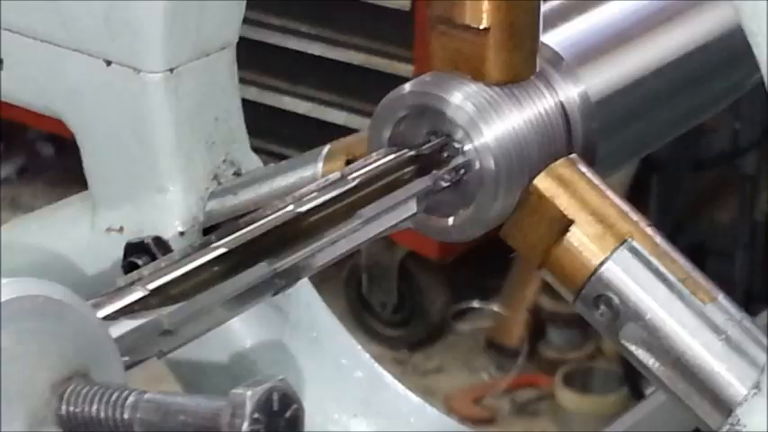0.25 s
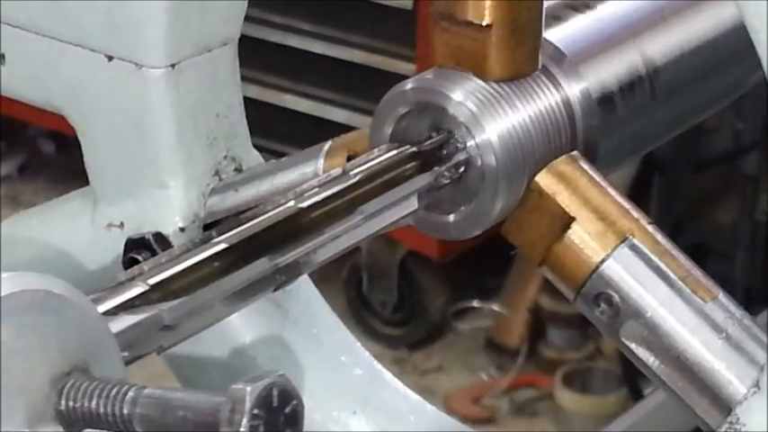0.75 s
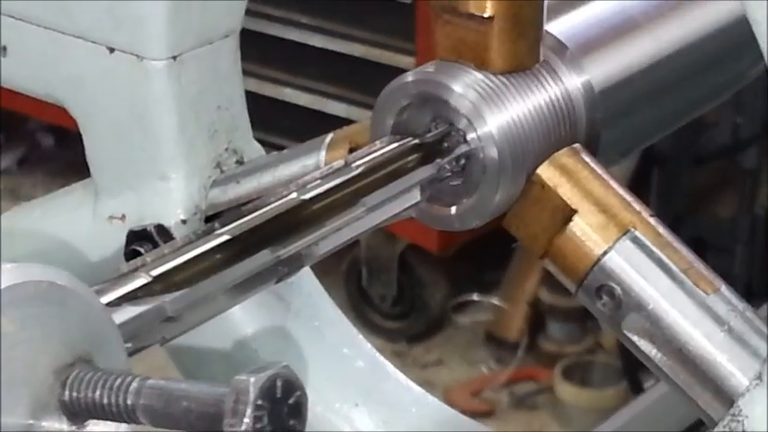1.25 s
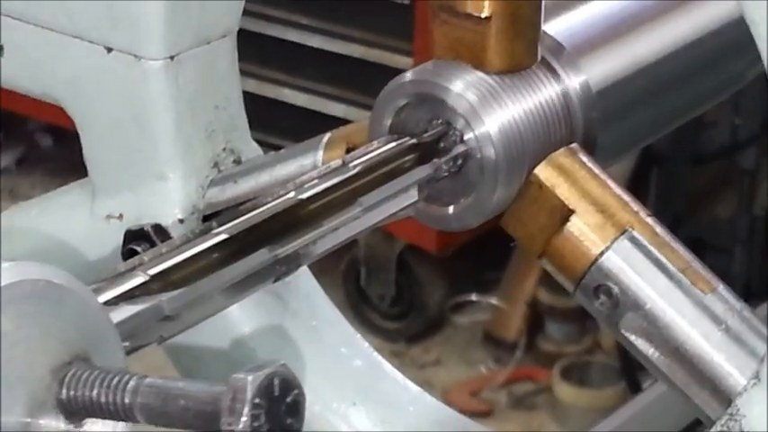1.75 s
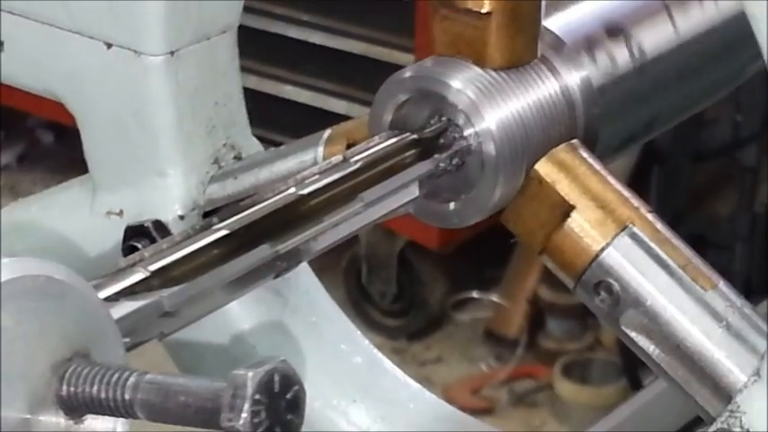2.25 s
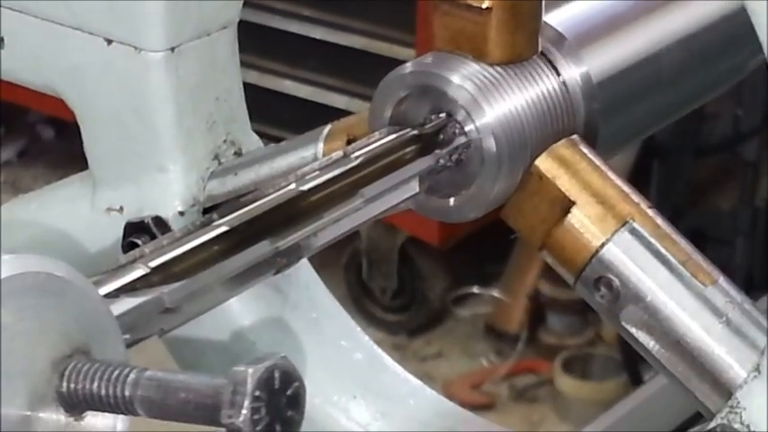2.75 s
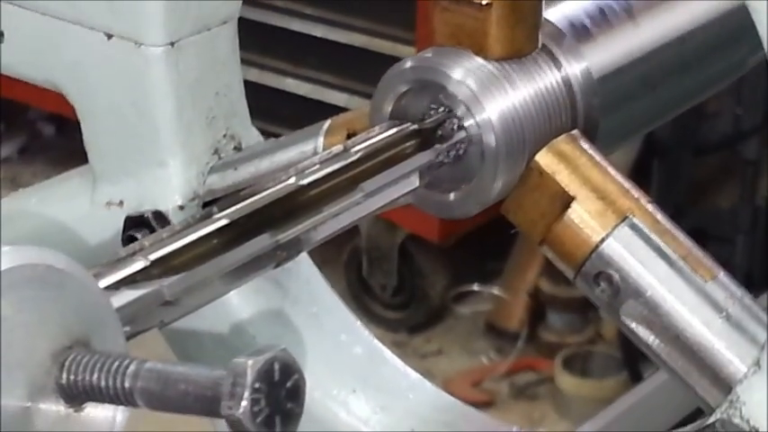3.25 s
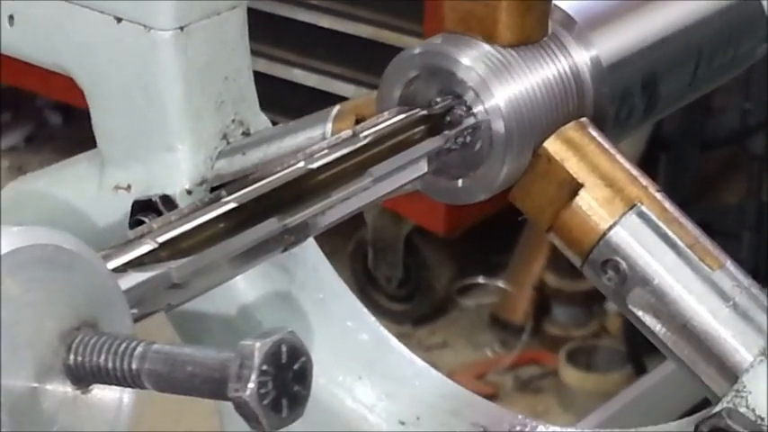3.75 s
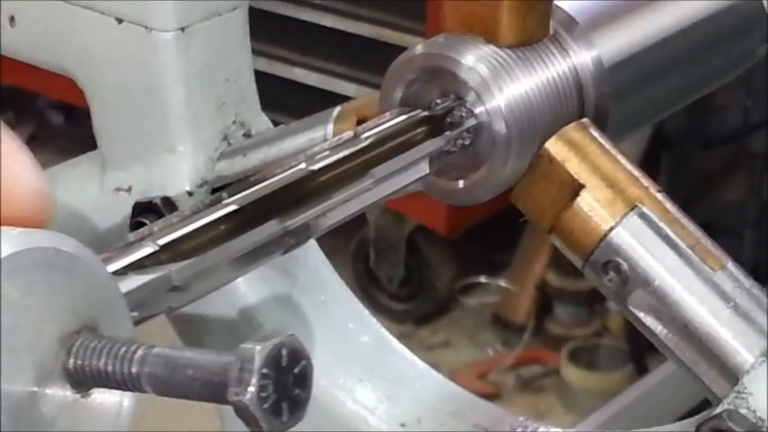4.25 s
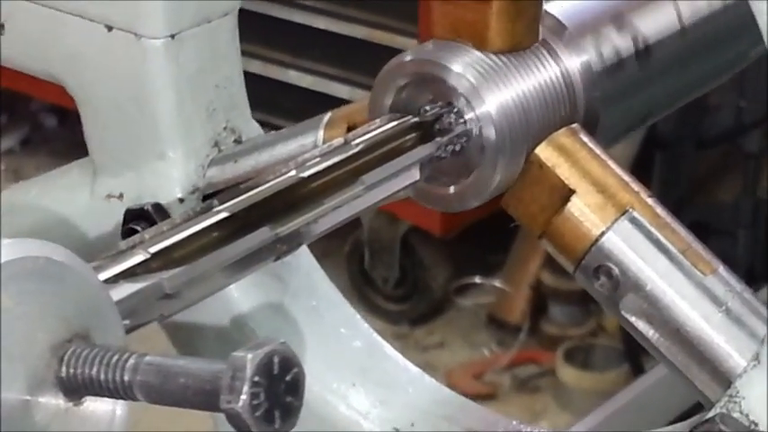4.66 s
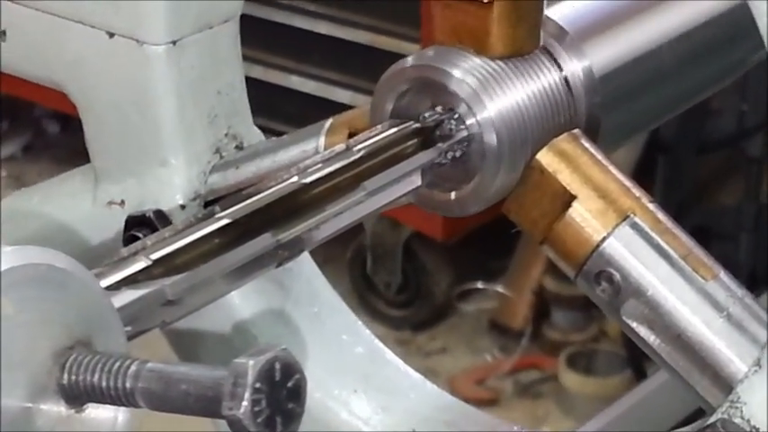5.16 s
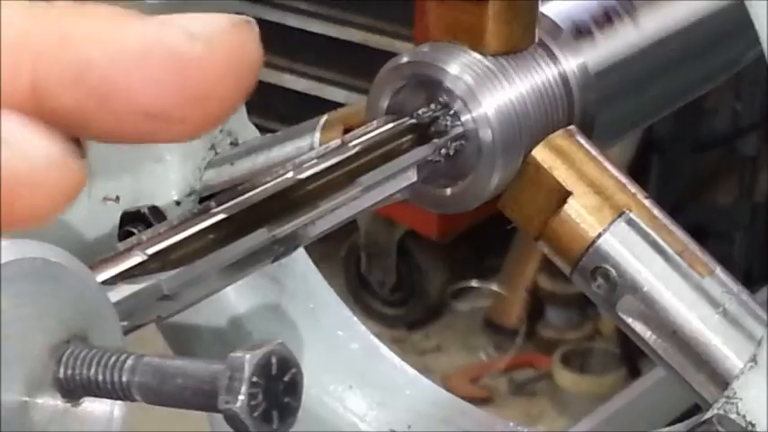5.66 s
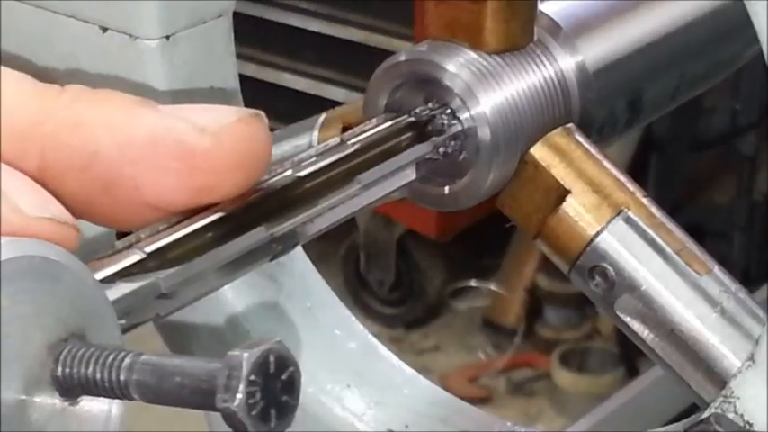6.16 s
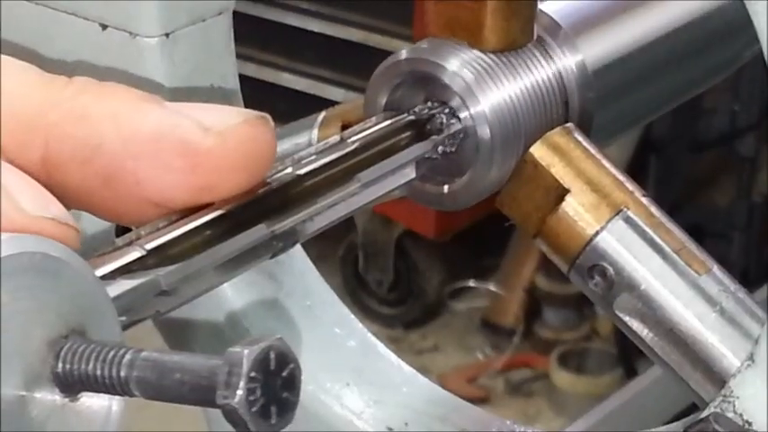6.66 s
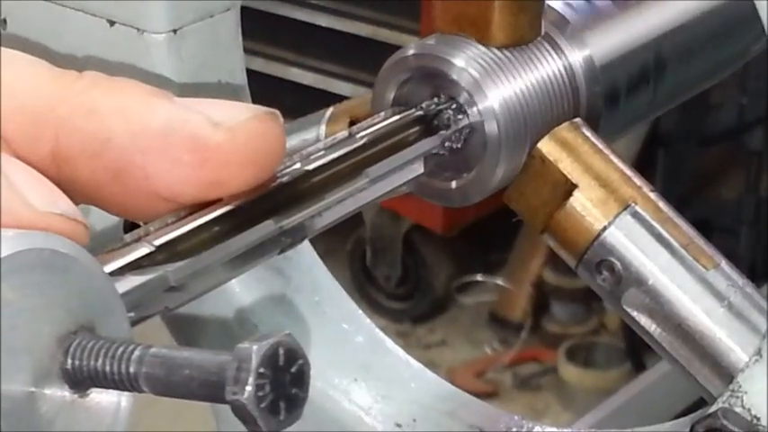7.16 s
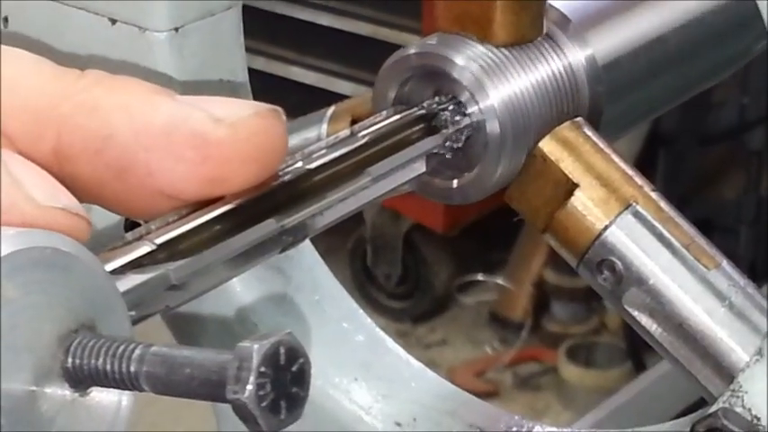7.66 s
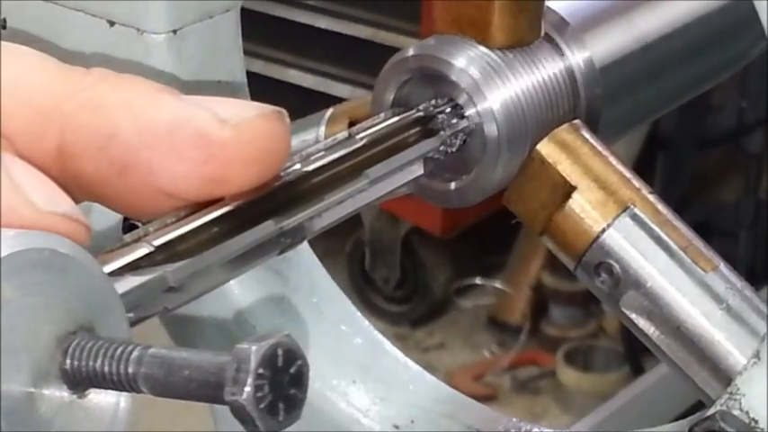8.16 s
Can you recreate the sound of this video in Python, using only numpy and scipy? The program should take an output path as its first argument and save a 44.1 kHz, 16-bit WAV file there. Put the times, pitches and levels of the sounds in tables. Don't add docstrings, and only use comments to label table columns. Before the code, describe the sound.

Close, steady motor hum and soft machine rush, with very high metallic chirps pulsing from the cutting tool, pausing, then shrieking at the end.

```python
import sys
import numpy as np
from scipy import signal
from scipy.fft import rfft, irfft
from scipy.io import wavfile
from scipy.ndimage import uniform_filter1d

SR = 44100
rng = np.random.default_rng(int(sys.argv[2]) if len(sys.argv) > 2 else 0)


def materialize(psi):
    bounded = np.clip(np.atleast_2d(psi).T, -1, 1)
    quanta = np.round(bounded * 32767).astype(np.int16)
    wavfile.write(sys.argv[1], SR, quanta)


def ratio_of_db(decibels):
    return 10 ** (np.asarray(decibels, float) / 20)


N = 370881
TIME = np.arange(N) / SR
BOTH_SIDES = np.array([[.5], [-.5]])


def walk(rate):
    hold = int(SR / rate)
    steps = np.repeat(rng.standard_normal(N // hold + 1), hold)
    return 1.6 * uniform_filter1d(uniform_filter1d(steps, hold), hold)[:N]


def ports(phase, db, pan_db, lead):
    share = ratio_of_db(BOTH_SIDES * pan_db) / np.sqrt(np.cosh(pan_db * np.log(10) / 20))
    return np.sqrt(2) * ratio_of_db(db) * share * np.sin(phase + BOTH_SIDES * lead)


def on_log_axis(hz, table):
    table = np.array(table)
    return np.interp(np.log(hz), np.log(table[:, 0]), table[:, 1])


# (f/Hz, level/dB per Hz)
RUSH_LEFT = [(30, -80), (90, -80), (125, -62), (165, -70.5), (260, -65), (520, -70), (900, -71.5),
             (2000, -73), (3350, -81), (4000, -77), (6000, -83.5), (8500, -87.5), (11000, -96.5),
             (14500, -100)]
RUSH_RIGHT = [(30, -88), (90, -82), (125, -66.5), (165, -68), (260, -65), (520, -70), (900, -73.5),
              (1800, -75), (2300, -80), (3400, -85.5), (4200, -83), (5800, -86), (8800, -88.5),
              (14500, -102)]
# (f/Hz, width/Hz, left level/dB, right level/dB)
CASING = [(368.5, 13, 12, 8.5), (433, 18, 8, 11.5), (450, 23, 4, 4), (630, 71, 3.5, 3.5), (812, 67, 6, 3.5),
          (1304, 56, -1, 2.5), (1570, 130, 1.5, -2.5), (2040, 65, 1.5, -0.5), (2910, 190, 4, -1),
          (3960, 270, 3, 6), (4950, 130, 8, 8.5), (7190, 1840, 0.5, 10.5), (8900, 320, 5.5, -1.5),
          (10240, 560, 4, 2.5), (11550, 670, -3.5, -7), (12000, 380, 9.5, -6), (13400, 340, 4.5, -2),
          (14170, 250, 6, 4)]
# (f/Hz, correlation)
ALIKE = [(60, 0.64), (130, 0.81), (290, 0.79), (630, 0.58), (1390, -0.2), (3040, -0.024), (6660, -0.036),
         (14600, -0.0017)]


def rush():
    hz = np.maximum(np.fft.rfftfreq(N, 1 / SR), 1)
    db = np.array([on_log_axis(hz, RUSH_LEFT), on_log_axis(hz, RUSH_RIGHT)])
    for centre_hz, width_hz, left_db, right_db in CASING:
        db = db + np.array([[left_db], [right_db]]) / (1 + (2 * (hz - centre_hz) / width_hz) ** 2)
    ripple = uniform_filter1d(uniform_filter1d(rng.standard_normal(db.shape), size=90), size=90)
    db = db + 2.0 * ripple / ripple.std() * np.clip(hz / 900, 0, 1)
    db = db - 40 * np.clip((hz - 14550) / 500, 0, 1)

    alike = np.clip(on_log_axis(hz, ALIKE), -.99, .99)
    mid, side = rfft(rng.standard_normal((2, N)))
    mixed = np.sqrt(1 + alike) * mid + np.sqrt(1 - alike) * side * np.array([[1], [-1]])
    spectrum = ratio_of_db(db) * np.sqrt(SR / 4) * mixed

    out = 0
    for octave in range(5, 15):
        share = np.cos(np.pi / 2 * np.clip(np.log2(hz) - octave, -1, 1)) ** 2
        flicker_db = 0.34 * walk(5.2) + 0.56 * walk(25)
        out = out + ratio_of_db(flicker_db) * irfft(spectrum * share, N)
    return out


# (f/Hz, level/dB, left minus right/dB, left leads/rad)
GEARS = [(135, -52.4, 0, 0.2), (330, -52.9, 7, -0.1), (432, -48.5, -3, 0.6), (456, -48.1, 0, 0.0),
         (466, -51.6, -2, 0.4), (919, -60.5, 0, 0.5), (1223, -54.5, 1, 1.7), (1312, -58.6, 17, 3.0),
         (1378, -57.7, -2, -2.5), (1432, -50.0, 5, -2.3), (1472, -53.9, 9, -2.2), (1551, -56.0, 5, -2.6),
         (1563, -51.7, 13, -2.2), (1581, -60.8, 7, -3.1), (1758, -59.8, 7, 1.3), (1879, -59.2, -6, 0.6),
         (1892, -62.1, 6, -1.0), (1908, -62.6, 6, 0.1), (2053, -63.3, 22, -0.6), (2083, -64.6, 13, 0.9),
         (2162, -63.8, 4, -0.3), (2185, -61.6, 10, -0.7), (2212, -61.3, 14, -0.8), (2269, -64.4, 7, 0.3),
         (2623, -62.3, 4, 1.9), (2743, -54.6, 22, -2.6), (2863, -63.4, 6, 2.6), (2913, -58.3, 13, 1.2),
         (2983, -56.3, 13, -2.9), (4037, -67.3, 5, -1.4)]
BEATING = [
    (479.3, -49.5, -1, .4),
]


def gear_tone(row, wear, s):
    hz, db, pan_db, lead = row
    phase = 2 * np.pi * hz * s + .6 * wear * walk(3)
    return ports(phase, db + 1.4 * wear * walk(4), pan_db, lead)


def gears():
    worn = sum(gear_tone(row, 1, TIME) for row in GEARS)
    return worn + gear_tone(BEATING[0], .1, TIME + .0006)


# (t/s, gain/dB, length/s)
BITES = [
    (.55, -3, 0.084),
    (1.1, 3, 0.3),
    (1.767, 6, .1),
    (3.19, -8, 0.091),
    (3.7, 7, .2),
    (4.95, 6, .08),
    (5.45, -1, 0.18),
    (8.05, 3, 0.1),
    (8.41, -13, 0.14),
]


def groan(x):
    bite_db = -0.6 + sum(db * np.exp(-((TIME - s) / length) ** 2) for s, db, length in BITES)
    hz = np.fft.rfftfreq(N, 1 / SR)
    bed = irfft(rfft(x) * np.clip(6 - np.abs(hz - 437) / 6, 0, 1), N)
    return x + bed * (ratio_of_db(bite_db) - 1)


HUM_HZ, ROTOR_HZ = 119.96, 58.6
DISPERSION = 1.2
# (multiple of the hum, level/dB, left minus right/dB, left leads/rad)
IRON = [(1, -22.4, 1.5, 0.3), (2, -42.6, -6, -0.8), (3, -33.4, 3, 0.1), (4, -49.5, -1, 0.4),
        (5, -40.1, 6, 0.4), (6, -50.4, -3, 1.1), (7, -52.4, -3, 0.6), (8, -59.4, -6, 2.2),
        (9, -53.0, 10, 1.8), (10, -60.2, 3, -0.2), (12, -64.2, 0, 2.6), (17, -63.9, 1, 1.1),
        (19, -60.2, 7, 0.9), (20, -68.9, 3, 1.4), (22, -66.5, 3, 2.2), (24, -69.5, 0, -0.6)]
ROTOR = [(1, -53.0, -1, 0.7), (3, -54.9, 1, 0.4), (5, -51.5, 1, 0.5), (7, -48.9, 0, -0.0),
         (15, -58.4, 11, 0.5), (45, -60.1, 18, -2.9), (65, -58.6, 11, -2.6), (70, -62.6, 15, 0.8),
         (75, -62.6, 9, 2.5), (80, -66.0, 4, -1.1), (85, -67.0, 0, 1.1)]
# (t/s, hum level/dB)
SUPPLY = [
    (0.1, -23),
    (2.95, -22.5),
    (3.11, -22.5),
    (4.53, -23),
    (8.07, -23),
    (8.3, -22.5),
]


def motor():
    s, supply_db = np.transpose(SUPPLY)
    load_db = np.interp(TIME, s, supply_db - supply_db.mean())
    turn = 2 * np.pi * TIME
    out = 0
    for k, db, pan_db, lead in IRON:
        phase = k * HUM_HZ * turn + DISPERSION * k ** 2
        waver_db = 0.085 * (k - 1) * walk(6.2)
        out = out + ports(phase, db + load_db + waver_db, pan_db, lead)
    for k, db, pan_db, lead in ROTOR:
        out = out + ports(k * ROTOR_HZ * turn, db + .5 * walk(1.7), pan_db, lead)
    return out


# (t/s, f/Hz, level/dB)
CREAK = [
    (5.41, 1450, -62),
    (5.418, 1550, -45),
    (5.426, 1800, -43),
    (5.44, 1850, -44),
    (5.452, 1850, -62),
]


def creak():
    s, hz, db = np.transpose(CREAK)
    phase = 2 * np.pi * np.cumsum(np.interp(TIME, s, hz)) / SR
    return ports(phase, np.interp(TIME, s, db, left=-120, right=-120), pan_db=-1, lead=.5)


# (t/s, peak level/dB)
TICKS = [(0.5794, -53), (0.7183, -38), (3.0394, -51), (3.3794, -55), (3.5224, -49), (4.3294, -52),
         (4.776, -36), (5.1228, -40), (5.5483, -37), (6.0327, -35), (8.0394, -56)]


def ticks():
    size = np.zeros(N)
    for at, db in TICKS:
        size += ratio_of_db(db + 8) * (TIME >= at) * np.exp(-np.abs(TIME - at) / .0007)
    bright = signal.butter(2, [11000, 16000], "band", fs=SR, output="sos")
    return signal.sosfilt(bright, size * rng.standard_normal((2, N)))


TRAIL_S, LEAD_GROW_MS, TRAIL_GROW_MS, TRAIL_FALL_MS = 0.046, 4.1, 6.5, 6.4
LEAD_PAN_DB, TRAIL_PAN_DB, PAN_DB_PER_DB = -0.5, 1, .35
# (t/s, leading level/dB, trailing level/dB, fall/ms per 5 dB)
PASSES = [(.624, -48.5, -70, 6), (.947, -39, -70, 6), (1.757, -38, -39, 14), (2.08, -42.5, -70, 10),
          (2.234, -39.5, -70, -1), (2.721, -37, -46, 11), (2.885, -40.5, -70, 12), (3.04, -35, -70, 3),
          (3.208, -50.5, -46.5, 12), (3.365, -35, -29, 18), (3.524, -34, -46, 9), (3.693, -35, -23, 19),
          (3.844, -34.5, -51, 5), (4.013, -39.5, -70, 11), (4.172, -30.5, -31.5, 12),
          (4.33, -32.5, -29.5, 10), (4.495, -32.5, -33, 7.5), (4.65, -35.5, -70, 6), (4.818, -47, -70, 5),
          (4.975, -48, -44.5, 9), (5.142, -33.5, -51, 7), (5.299, -54, -70, 5), (5.457, -48, -70, 11),
          (5.951, -37.5, -67, 8), (6.106, -49, -69.5, 9), (8.202, -36, -70, 6)]
# (t/s, peak level/dB, growth/ms per 5 dB, fall/ms
# per 5 dB)
SINGLE_GRABS = [(.157, -52, 10, 9), (1.009, -27.5, 10, 6.5), (1.078, -34.5, 7, 5), (1.121, -39, 10, 9),
                (1.153, -51, 8, 6), (2.683, -53, 4, 4), (3.425, -34, 0, 12), (3.497, -45.5, 6, 4),
                (3.58, -42, 1, 5), (3.778, -48.5, 0.5, 4), (3.804, -49.5, 6, 17), (4.24, -41.5, 6, 9),
                (4.304, -47, 8, 5), (4.433, -51.5, 7, 15), (6.582, -52.5, 3, 6), (7.602, -56, 10, 5),
                (8.085, -26.5, 10, 4.5), (8.126, -44.5, 8, 14), (8.227, -21, 5.5, 4), (8.244, -19.5, 2.5, 10),
                (8.313, -26.5, 4, 4), (8.327, -27, 5, 5), (8.37, -26, 9, 6), (8.407, -15, 6, 11)]


def grabs():
    def lean(db):
        return TRAIL_PAN_DB + PAN_DB_PER_DB * (db + 40.5)

    rows = []
    for s, lead_db, trail_db, fall in PASSES:
        rows.append((s, lead_db, LEAD_GROW_MS, fall, LEAD_PAN_DB))
        if trail_db > -65:
            rows.append((s + TRAIL_S, trail_db, TRAIL_GROW_MS, TRAIL_FALL_MS, lean(trail_db)))
    for s, db, grow, fall in SINGLE_GRABS:
        rows.append((s, db, grow, fall, lean(db)))
    return sorted(rows)


PULL_HZ_PER_DB = 4
# (t/s, f/Hz)
SHANK = [
    (0, 9100),
    (1.0, 9060),
    (2.1, 9170),
    (3.7, 9100),
    (4.5, 9140),
    (5.0, 9200),
    (6.1, 9450),
    (8.0, 9190),
    (8.41, 9150),
]
# (t/s, left leads/rad)
SQUEAL_LEAD = [
    (0, -1.4),
    (4.33, -1.53),
    (4.4, 1.1),
    (6, 2),
    (8.41, 0.74),
]


def squeal():
    bursts = grabs()
    s, peak_db = np.transpose(bursts)[:2]
    hz = np.interp(s, *np.transpose(SHANK)) - PULL_HZ_PER_DB * (peak_db + 39)

    size = np.zeros((2, N))
    for at, db, grow, fall, pan_db in bursts:
        span = slice(max(int((at - .08) * SR), 0), int((at + .15) * SR))
        ms = 1000 * (TIME[span] - at)
        rise_steps = (np.abs(ms) / max(grow, 2)) ** 2.1
        fall_steps = (np.abs(ms) / max(fall, 2)) ** 1.26
        top = ratio_of_db(-5 * np.where(ms < 0, rise_steps, fall_steps))
        tail = ratio_of_db(-25.0 - 0.25 * ms) * np.clip(ms / 6, 0, 1)
        size[:, span] += ratio_of_db(db + BOTH_SIDES * pan_db) * (top + tail)
    size = .2 * np.tanh(uniform_filter1d(size, size=70) / .2)

    phase = 2 * np.pi * np.cumsum(np.interp(TIME, s, hz) + 22 * walk(110)) / SR
    lead = np.interp(TIME, *np.transpose(SQUEAL_LEAD)) + 0.26 * walk(30)
    flicker_db = .9 * np.array([walk(200), walk(200)])
    twin_db = np.minimum(-15 + 4 * walk(20), -11)
    twin = ports(phase + 2 * np.pi * 130 * TIME, twin_db, -4, lead - 1.5)
    tone = size * ratio_of_db(flicker_db) * (ports(phase, 0, 0, lead) + twin)

    hiss_band = signal.butter(2, [9700, 11800], "band", fs=SR, output="sos")
    tear = signal.sosfilt(hiss_band, rng.standard_normal((2, N)))
    growth = np.clip(np.gradient(size, axis=1) * SR / 200, 0, None)
    return tone + ratio_of_db(-18) * growth * tear


def scene():
    return groan(rush() + gears()) + motor() + creak() + ticks() + squeal()


def top_cut(x):
    return signal.sosfilt(signal.butter(12, 15200, fs=SR, output="sos"), x)


def record(dry):
    hz = np.fft.rfftfreq(N, 1 / SR)
    spectrum = rfft(dry)
    treble = irfft(spectrum * np.clip((hz - 9700) / 500, 0, 1), N)
    masker = irfft(spectrum * (np.abs(hz - 9150) < 400), N)
    masker_power = uniform_filter1d(np.mean(masker ** 2, axis=0), size=1024, origin=500)
    loud_db = 10 * np.log10(masker_power + 1e-12)
    treble_gain = ratio_of_db(.9 * walk(45) - .6 * np.clip(loud_db + 42, 0, 6))
    near = irfft(spectrum * np.clip(np.minimum(hz - 9600, 12200 - hz) / 400, 0, 1), N)
    near_gain = ratio_of_db(-1.5 * np.clip(loud_db + 39, 0, 6))
    mix = dry - (1 - treble_gain) * treble - treble_gain * (1 - near_gain) * near
    return top_cut(mix)


dry = scene()
out = record(dry)
materialize(out)
```